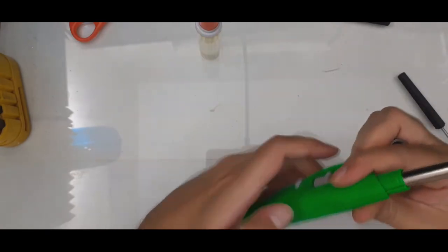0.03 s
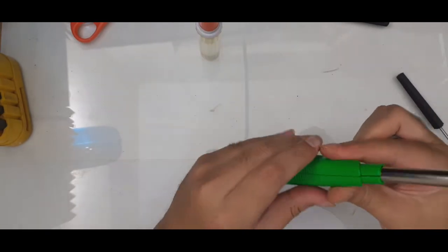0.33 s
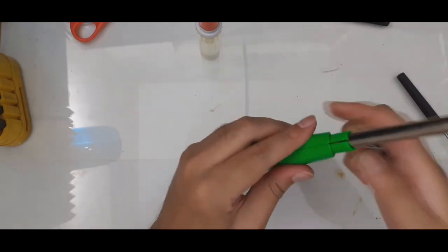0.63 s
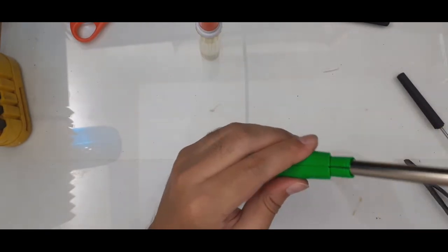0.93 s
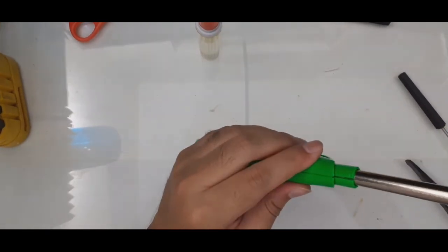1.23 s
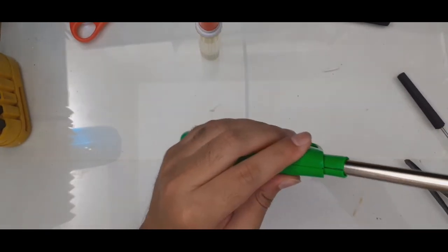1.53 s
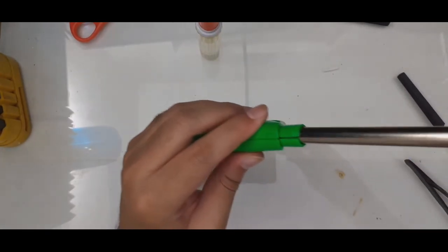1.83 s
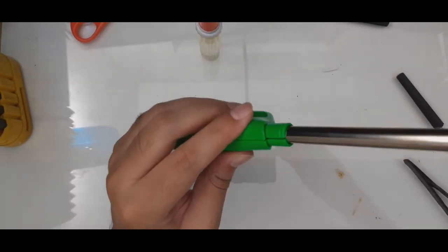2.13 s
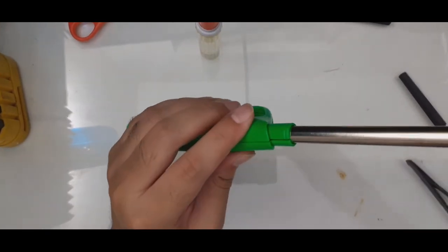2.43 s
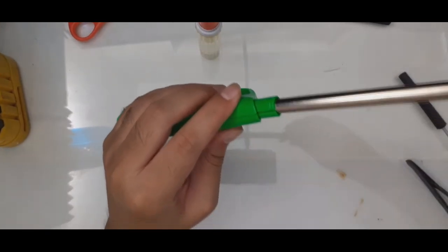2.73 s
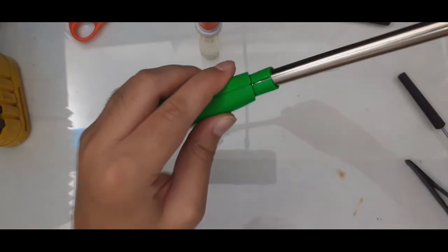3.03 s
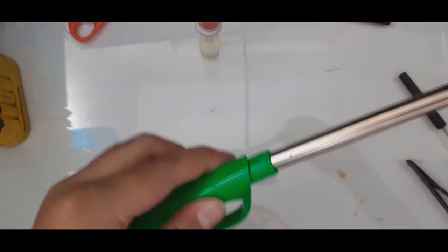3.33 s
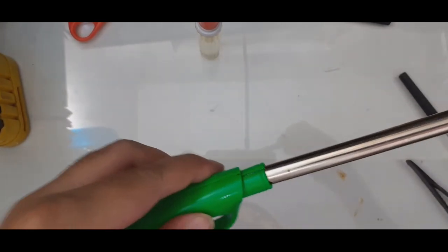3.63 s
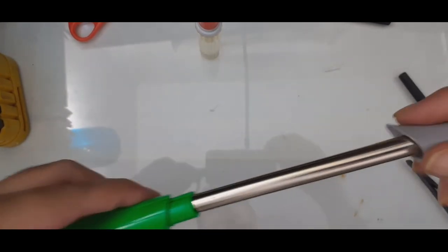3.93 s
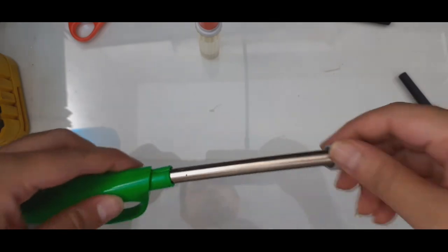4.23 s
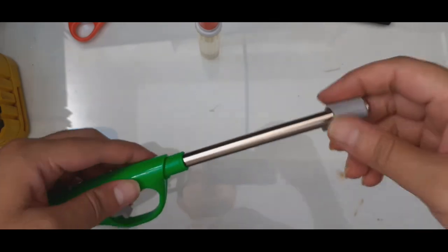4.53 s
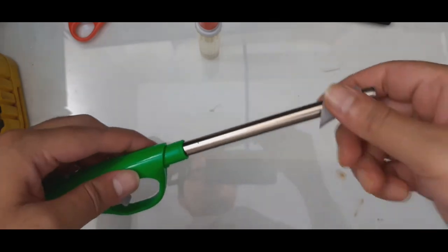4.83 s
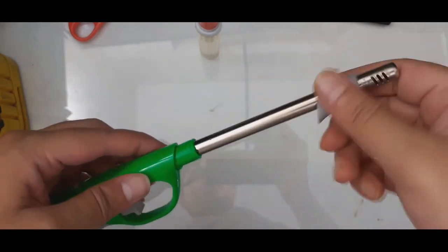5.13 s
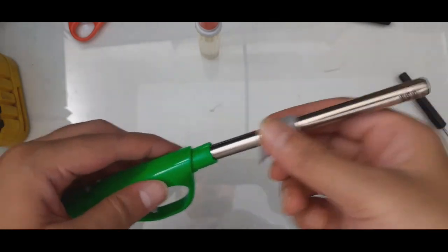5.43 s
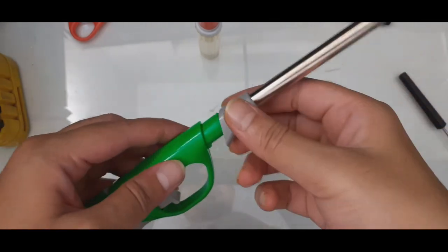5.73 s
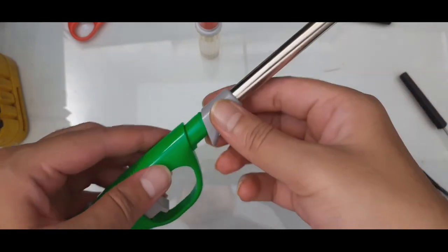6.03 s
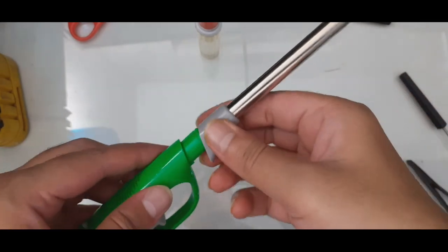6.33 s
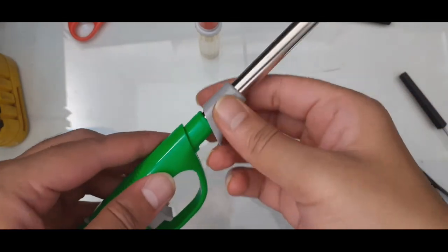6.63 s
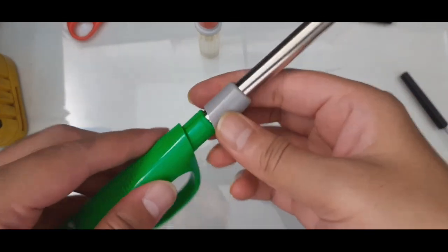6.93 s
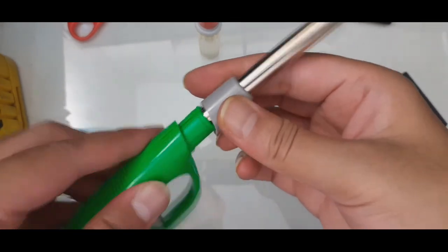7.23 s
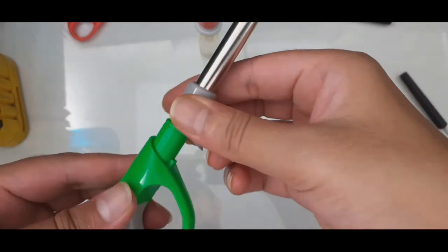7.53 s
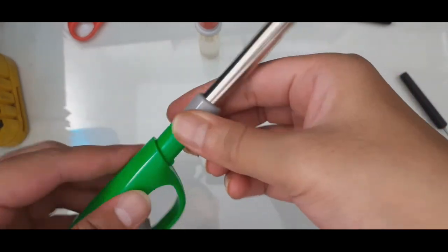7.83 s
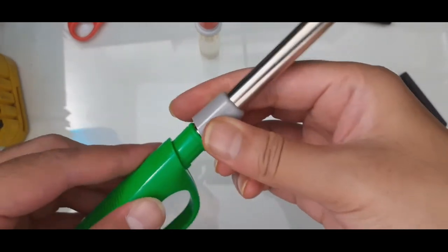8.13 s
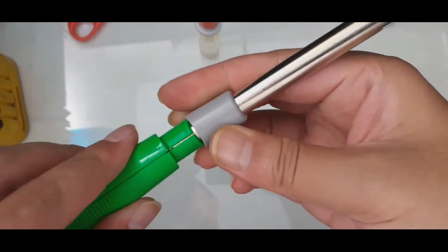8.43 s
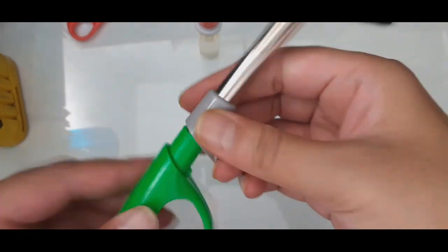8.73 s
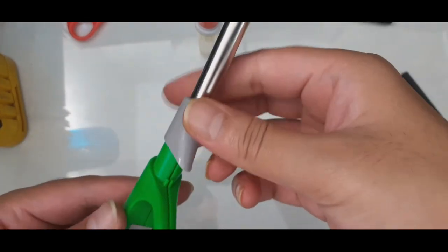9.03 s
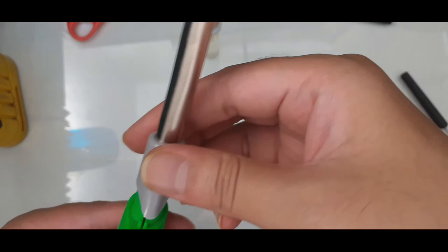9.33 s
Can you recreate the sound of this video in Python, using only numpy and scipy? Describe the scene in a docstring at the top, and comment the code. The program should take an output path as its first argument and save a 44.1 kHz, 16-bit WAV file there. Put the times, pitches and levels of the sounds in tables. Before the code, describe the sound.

Hands turn a long-necked plastic lighter close to the microphone, making light clicks and skin rustle. A dragging finger squeaks on the shell, followed by rubbing, dull bumps and louder clicks. A collar is fitted over the metal barrel, slides down with a short ringing scrape and snaps sharply against the handle. A few soft clicks close, over the low rumble of a small room.

```python
"""Light plastic clicks and skin rustle, close by: two hands turn a long-necked lighter over a table.
A dragging finger squeals on the shell by stick-slip; rubbing, dull bumps and louder clicks follow.
A collar is fitted over the metal barrel, scrapes down it, setting it ringing, and snaps against
the handle. A few soft clicks close. The small room rumbles throughout, with a faint far chirp."""
import sys
import numpy as np
from scipy import signal
from scipy.fft import rfft, irfft, next_fast_len
from scipy.io import wavfile
from scipy.ndimage import map_coordinates

SR = 44100
rng = np.random.default_rng(int(sys.argv[2]) if len(sys.argv) > 2 else 0)


def to_wav(s):
    """Save 16-bit WAV."""
    ch = np.atleast_2d(s).T  # columns
    pcm = np.round(np.clip(ch, -1, 1) * 32767)  # PCM
    wavfile.write(sys.argv[1], SR, pcm.astype(np.int16))


N = 414099
TIME = np.arange(N) / SR

# shell resonances: pitch_hz, width_hz, level_db
SHELL_MODES = [(1016, 150, -3.5), (1310, 340, -2.5), (1640, 370, 4), (2146, 800, 0), (2345, 93, 6.5),
               (2760, 200, -4.5)]
# spectrum of a contact's crack: freq_hz, level_db
CRACK_SPECTRUM = [(3000, 3), (4200, 4.5), (5200, 0.5), (7400, 3), (9500, -5), (12000, -8), (15500, -11)]
# contacts of shell, collar and barrel: start_s, body_db, pitch_hz, crack_db, crack_top_hz, pan_db
CLICKS = [(0.169, -42.5, 3520, -46, 9000, -1), (0.193, -41, 3700, -43, 7500, 1),
          (0.3578, -53, 3750, -53, 15000, 0), (0.562, -31, 1620, -43, 15000, -1),
          (0.584, -38, 1690, -49.5, 12000, -6), (1.466, -28.5, 1360, -51.5, 13900, -7),
          (1.853, -27, 1370, -43.5, 15000, -5), (2.8022, -40, 1040, -54, 12100, 0),
          (2.9194, -35, 1580, -45, 5000, 5), (3.1924, -38.5, 2060, -46.5, 15400, -4),
          (3.893, -47, 1540, -51, 9000, 8), (3.921, -25.5, 2360, -43, 11730, 2),
          (3.9742, -19, 1572, -45, 12000, 4), (3.987, -23, 2430, -38.5, 14000, -3),
          (4.0248, -32, 1620, -53, 9000, 3), (4.2061, -29.5, 1810, -44, 14500, -1),
          (4.2174, -30, 1890, -41.5, 12000, 5), (4.2522, -37, 1960, -46, 9000, 2),
          (4.7334, -28.5, 2230, -46, 12000, 4), (4.768, -29.5, 1680, -40.5, 11000, 4),
          (4.7758, -31, 1720, -51, 9000, 3), (4.8064, -34, 1620, -47, 11000, 5),
          (5.0046, -32, 1770, -59, 8000, 4), (5.1549, -28, 2310, -38.5, 14000, 1),
          (5.179, -13, 1876, -27, 15000, 0.5), (5.223, -31, 1820, -50, 12000, -1),
          (5.293, -27, 2200, -47, 11000, 3), (5.719, -33, 2050, -56, 8000, -1),
          (6.401, -43.5, 1820, -65, 7000, 6), (7.019, -47, 1850, -60.5, 6000, 4),
          (7.0778, -47, 2435, -57.5, 8160, 2), (7.7899, -44.5, 1715, -56.5, 7500, 4.5),
          (7.9744, -39.5, 1746, -58, 9000, 4), (8.6371, -49, 2550, -62, 8000, 3),
          (8.7283, -41.5, 2210, -48, 4770, 5), (8.8076, -45.5, 1720, -60, 9000, 12),
          (8.9985, -60, 2390, -58, 10000, 4)]


def clicks(rebound_s=0.0026, rebound_db=-8, ring_s=0.0071, small_part_hz=2500, small_db_per_octave=18):
    """Each contact cracks, rebounds once and rings both the shell and the struck spot."""
    crunch, t = contact_noise(), TIME[:2048]
    rings, body, crack = np.zeros((3, 2, N))

    def blow(decay_s):
        """Force of the first touch and its rebound."""
        rebound = (t > rebound_s) * np.exp(-abs(t - rebound_s) / decay_s)
        return np.exp(-t / decay_s) + from_db(rebound_db) * rebound

    for start_s, body_db, pitch_hz, crack_db, crack_top_hz, pan_db in CLICKS:
        start = round(start_s * SR)
        span = slice(start, start + len(t))
        sides = pan(pan_db)
        # small, high parts ring more by themselves and less through the shell
        loose_db = small_db_per_octave * max(0, np.log2(pitch_hz / small_part_hz))
        ring = np.exp(-t / ring_s) * np.sin(2 * np.pi * pitch_hz * t)
        rings[:, span] += sides * from_db(body_db + loose_db / 2) * ring
        body[:, span] += sides * from_db(body_db - loose_db) * blow(decay_s=0.0017) * crunch[:, span]
        lowpass = signal.butter(3, crack_top_hz, fs=SR, output="sos")
        snap = signal.sosfilt(lowpass, blow(decay_s=0.0021) * crunch[:, span])
        crack[:, span] += sides * from_db(crack_db) * snap
    shell = from_db(-6) * resonate(body, SHELL_MODES)
    return shell + from_db(-11) * rings + from_db(6) * coloured(crack, CRACK_SPECTRUM)


# collar-on-barrel resonances: pitch_hz, width_hz, level_db
COLLAR_MODES = [(1100, 280, 1.5), (1540, 190, 2), (2080, 240, -4), (2520, 220, -7.5), (2900, 180, -7)]
# narrow resonances of the metal barrel: pitch_hz, width_hz, level_db
BARREL_MODES = [(1741, 45, -2.5), (2070, 16, -17.5), (2770, 58, -16.5), (5760, 70, -16), (6430, 80, -13)]
# scrape spectrum: freq_hz, level_db
SLIDE_HISS = [(3000, -2.5), (3350, -8), (3700, -4.5), (4050, -9), (4530, -2), (5200, -2), (6500, -3.5),
              (7400, -8.5), (9500, -13), (11000, -8.5), (13000, -17), (15300, -27)]
# barrel rings that come and go as the collar passes: peak_s, pitch_hz, level_db
PASSING_RINGS = [(5.34, 4680, -47), (5.36, 2880, -47.5), (5.44, 3660, -36), (5.45, 2480, -39),
                 (5.51, 4550, -35.5), (5.51, 2960, -40)]


def collar_slide(start_s=5.298, end_s=5.574, start_speed=0.15):
    """The collar speeds up evenly down the barrel, chattering on it and setting it ringing."""
    travel_s = [start_s, end_s]
    speed = np.interp(TIME, travel_s, [start_speed, 1])
    moving = swell(start_s, rise_s=0.003, fall_s=0.0047, hold_s=end_s - start_s)
    rasp = from_db(-1.5 * drift(120))
    drag = unit_rms(rasp * friction(catches_per_s=1500, spread_db=1.5, smooth=0.7))
    hiss = from_db(-31.5) * moving * speed ** 1.48 * coloured(drag, SLIDE_HISS)
    # a near reflection shifts the colour as the hand travels
    lag_s = np.interp(TIME, travel_s, [0.000415, 0.00045])
    reflection = 0.35 * np.array([np.interp(TIME - lag_s, TIME, channel) for channel in hiss])
    chatter = from_db(-29) * moving * speed ** 1.49 * drag
    collar = from_db(-10) * resonate(chatter, COLLAR_MODES)
    barrel = from_db(-2) * resonate(chatter, BARREL_MODES)
    # the barrel's main resonance climbs as the collar nears the handle
    singing_hz = np.interp(TIME, travel_s, [1554, 1793])
    singing = from_db(3.5) * glide(chatter, singing_hz, width_hz=150)
    passing = sum(from_db(level_db) * swell(peak_s, 0.065, 0.065) * band(drag, pitch_hz, width_hz=160)
                  for peak_s, pitch_hz, level_db in PASSING_RINGS)
    return (collar + barrel + singing + hiss + reflection + moving * passing) * pan(0.5)


# collar strike and bounce: start_s, body_db, crack_db
COLLAR_HITS = [(5.5782, -15, -12.5), (5.5806, -19.5, -18)]


def collar_snap(ring_db=-27):
    """The collar hits the handle twice, ringing broadly in the shell and lingering in the barrel."""
    start_s, body_db, crack_db = np.transpose(COLLAR_HITS)
    crunch = contact_noise()
    blow = crunch * bursts(start_s, from_db(body_db), decay_s=0.0019)
    crack = crunch * bursts(start_s, from_db(crack_db), decay_s=0.0014)
    tail = crunch * bursts(start_s, from_db(body_db + ring_db), decay_s=0.038)
    shell = resonate(blow, [(1060, 900, -7), (1800, 630, 1.5), (2790, 930, -1), (3250, 630, -11)])
    barrel = resonate(tail, [(2420, 120, 0), (2830, 102, -1)])
    return coloured(crack, CRACK_SPECTRUM) + barrel + from_db(4.5) * shell


# squeal pitch, stepping up as the grip changes: time_s, pitch_hz
SQUEAL_PITCH = [(1.66, 1359), (1.72, 1386)]


def squeal(press_s=1.563, throb_hz=16.24, throb_crest_s=1.44, throb_end_s=1.73, flutter_db=3.5):
    """A finger's stick-slip sings a wavering note, throbbing at first, with an octave that fades."""
    pressure = from_db(-43.5) * swell(press_s, rise_s=0.29, fall_s=0.6, hold_s=0.46)
    pitch_hz = np.interp(TIME, *np.transpose(SQUEAL_PITCH)) + 12 * drift(60)
    phase = phase_of(pitch_hz) + np.array([[0], [0.6]])
    depth = 0.85 * np.clip((throb_end_s - TIME) * 10, 0, 1)
    throb = 1 + depth * np.cos(2 * np.pi * throb_hz * (TIME - throb_crest_s))
    fundamental = throb * from_db(flutter_db * drift(35)) * np.sin(phase)
    octave_db = -6 - 19 * np.maximum(TIME - press_s, 0)
    octave = from_db(octave_db + flutter_db * drift(35)) * np.sin(2 * phase)
    side_tone = band(stereo_noise(NEAR_CORRELATION), pitch_hz=1884, width_hz=25)
    onset = from_db(-64) * swell(1.32, rise_s=0.088, fall_s=0.1)
    return pressure * (fundamental + octave) + onset * side_tone


# single slips: start_s, level_db
SLIPS = [(1.465, -34), (1.51, -41), (1.553, -44), (1.665, -29.5), (1.706, -33), (1.790, -24.5),
         (1.8091, -24.5), (1.8542, -19), (1.9347, -26), (1.966, -32), (2.007, -24.5), (2.039, -35),
         (2.09, -35)]
# spells of grating: start_s, hold_s, level_db
GRATES = [(1.479, 0.11, -49), (1.657, 0.097, -48), (1.971, .13, -47.5)]
# resonances the slips excite: pitch_hz, width_hz, level_db
SLIP_MODES = [(1000, 170, -1.5), (1385, 194, 9.5), (1700, 320, 4), (2340, 340, -0.5), (2736, 116, 13.5)]


def finger_slips():
    """The squealing finger breaks into single slips and grating, which ring the shell."""
    slip_s, slip_db = np.transpose(SLIPS)
    slips = from_db(8.5) * bursts(slip_s, from_db(slip_db), decay_s=0.00002)
    spells = sum(from_db(level_db) * swell(start_s, rise_s=0.015, fall_s=0.062, hold_s=hold_s)
                 for start_s, hold_s, level_db in GRATES)
    grating = spells * friction(catches_per_s=160, spread_db=2, smooth=0.35)
    return resonate(slips + grating, SLIP_MODES)


# padded knocks: start_s, level_db, pitch_hz, rise_s
BUMPS = [(2.324, -35, 290.5, 0.017), (2.803, -17, 227, 0.0058), (2.822, -23, 257, 0.006),
         (2.844, -29, 208, 0.0076), (2.901, -21.5, 250, 0.0056), (2.918, -20, 158, 0.004)]


def bumps():
    """Padded knocks swell and die within a few cycles; damped flesh and plastic blur the pitch."""
    out, t = np.zeros(N), TIME[:SR // 4]
    wobble = 0.5 * drift(130)
    for start_s, level_db, pitch_hz, rise_s in BUMPS:
        start = round(start_s * SR)
        span = slice(start, start + len(t))
        push = (t / rise_s * np.exp(1 - t / rise_s)) ** 2
        out[span] += from_db(level_db) * push * np.sin(2 * np.pi * pitch_hz * t + wobble[span])
    return out


# finger and collar strokes: peak_s, rise_s, fall_s, body_db, hiss_db, ring_hz, ring_db
STROKES = [(2.35, 0.074, 0.23, -48, -48, 1480, -67), (2.815, 0.047, 0.12, -57, -58, 1720, -55.5),
           (2.935, 0.034, 0.11, -51, -55.5, 1590, -52), (3.203, 0.019, 0.089, -54.5, -54, 1700, -73),
           (3.75, 0.25, 0.26, -57.5, -55.5, 1487, -56), (3.945, 0.06, 0.04, -47, -51.5, 2420, -43),
           (4.002, 0.035, 0.15, -40, -45, 2500, -55), (4.225, 0.04, 0.078, -44.5, -54, 1830, -45),
           (4.295, 0.04, .11, -52.5, -51.5, 1520, -60), (4.73, 0.042, 0.015, -56, -51, 2100, -47),
           (4.785, 0.021, 0.061, -48, -50, 5000, -51.5), (5.172, 0.022, 0.027, -52, -47.5, 2250, -40),
           (7.31, 0.11, 0.11, -65.5, -62.5, 1550, -69), (8.8, 0.08, 0.065, -63, -64.5, 1710, -60.5)]
# bright tick of one early plastic click, then light brushes of skin: peak_s, rise_s, fall_s, level_db
TICK_AND_BRUSHES = [(0.359, .002, .01, -42), (0.925, 0.023, 0.026, -57), (1.155, 0.0093, 0.0097, -46.5),
                    (1.528, 0.053, 0.048, -51), (1.694, 0.037, 0.034, -51.5), (1.948, 0.68, 0.36, -66),
                    (2.45, 0.05, 0.12, -64), (2.79, 0.21, 0.079, -54.5), (7.794, 0.03, 0.03, -59.5)]
# spectra of stroke hiss, tick and brush hiss, and the shell's hollow undertone: freq_hz, level_db
RUB_HISS = [(1650, -56), (2800, -2.5), (3700, -5), (4400, -4.5), (5850, -5), (7400, -3), (8140, -6),
            (12200, -12.5), (13600, -19), (15500, -21)]
BRIGHT_HISS = [(4000, -8), (6500, 4.5), (8300, 3), (12000, -4.5), (15500, -9)]
UNDERTONE = [(330, -4), (440, 0), (620, -7)]


def rubs():
    """Skin and plastic drag, ringing the shell and hissing; a tick of hiss brightens one early click."""
    unevenness = from_db(1.8 * np.clip(drift(110), -2, 2))
    coarse = unit_rms(unevenness * friction(catches_per_s=400, spread_db=2, smooth=0.8))
    fine = friction(catches_per_s=2300, spread_db=5, smooth=1)
    body_gain, hiss_gain, rings = np.zeros(N), np.zeros(N), np.zeros((2, N))
    for peak_s, rise_s, fall_s, body_db, hiss_db, ring_hz, ring_db in STROKES:
        effort = swell(peak_s, rise_s, fall_s)
        body_gain += from_db(body_db) * effort
        hiss_gain += from_db(hiss_db) * effort
        rings += from_db(ring_db) * effort * band(coarse, ring_hz, width_hz=0.13 * ring_hz)
    bright_gain = sum(from_db(level_db) * swell(peak_s, rise_s, fall_s)
                      for peak_s, rise_s, fall_s, level_db in TICK_AND_BRUSHES)
    shell = resonate(coarse, SHELL_MODES) + from_db(-16.5) * coloured(coarse, UNDERTONE)
    hiss = from_db(2.5) * coloured(fine, RUB_HISS)
    strokes = body_gain * shell + rings + hiss_gain * hiss
    return strokes * pan(-0.2) + bright_gain * coloured(fine, BRIGHT_HISS)


# hand scuffs: peak_s, rise_s, level_db
SCUFFS = [(2.802, 0.0025, -44), (2.915, 0.05, -40), (8.45, 0.13, -59.5)]
# scuff spectrum: freq_hz, level_db
SCUFF_SPECTRUM = [(120, -1.5), (250, -2.5), (500, -6.5), (800, -8.5), (1100, -14.5), (1600, -18),
                  (2500, -25)]


def scuffs():
    """The hand drags dully along with the bumps and when it shifts its grip."""
    drag = friction(catches_per_s=980, spread_db=1.5, smooth=1)
    effort = sum(from_db(level_db) * swell(peak_s, rise_s, fall_s=0.16)
                 for peak_s, rise_s, level_db in SCUFFS)
    return effort * coloured(drag, SCUFF_SPECTRUM)


def fidget():
    """Restless fingers make faint patches of skin rustle."""
    activity = from_db(-78 + 3.5 * np.minimum(drift(6), 2))
    return activity * coloured(friction(catches_per_s=200, spread_db=3, smooth=1), RUB_HISS)


def far_chirps(period_s=0.4995, centre_hz=2420, fall_hz_per_s=380):
    """A faint, blurred squeak far away comes twice a second, each one sinking a little in pitch."""
    age_s = (TIME + period_s / 2) % period_s - period_s / 2
    pitch_hz = centre_hz - fall_hz_per_s * age_s + 22 * drift(70)
    phase = phase_of(pitch_hz) + np.array([[0], [1]])
    tone = np.sin(phase) + from_db(-10) * np.sin(2 * phase)
    pulse = np.exp(-0.5 * (age_s / 0.024) ** 2)
    tail = 0.35 * np.exp(-0.5 * ((age_s - 0.08) / 0.035) ** 2)
    return from_db(-66 + 2 * drift(30)) * (pulse + tail) * tone


# drone swells: peak_s, ramp_s, level_db
DRONE_SWELLS = [(2.2, 1, -44.5), (3.2, 0.42, -41.5), (4.1, 0.82, -46.5), (5.9, 0.61, -36),
                (7.55, 0.26, -45.5), (8.7, 0.53, -45.5)]
# spectra of room murmur and air hiss: freq_hz, level_db
MURMUR_SPECTRUM = [(36, -30.5), (62, -9), (76, -9), (99, -5), (130, -12.5), (205, -15.5), (226, -19),
                   (306, -24.5), (327, -29), (443, -31), (600, -40), (780, -40), (1320, -120)]
AIR_SPECTRUM = [(400, -8), (700, -10.5), (2000, -12), (3800, -20), (7500, -25), (10000, -29), (12500, -20),
                (15500, -23.5)]
# left-right likeness of far sound: freq_hz, correlation
FAR_CORRELATION = [(60, 1), (140, 0.91), (300, 0.68), (700, 0.15), (1500, 0.021), (12000, 0.0098)]


def room_rumble(drone_hz=51.9, drone_db=-51.5, upper_hz=92, width_hz=5):
    """A deep drone with a weaker upper tone surges; the murmur partly follows, under an even hiss."""
    def tone(pitch_hz):
        """A narrow resonance that swells and ebbs at random."""
        phase = 2 * np.pi * pitch_hz * TIME
        return unit_rms(drift(width_hz) * np.cos(phase) + drift(width_hz) * np.sin(phase))

    surge = 1 + sum(from_db(level_db - drone_db) * swell(peak_s, ramp_s, ramp_s)
                    for peak_s, ramp_s, level_db in DRONE_SWELLS)
    swelling = (surge - 1) * unit_rms(np.sin(phase_of(drone_hz + 2 * drift(5))))
    drone = from_db(drone_db) * (tone(drone_hz) + swelling + from_db(-11) * surge * tone(upper_hz))
    murmur = from_db(-50.5) * surge ** 0.28 * coloured(stereo_noise(FAR_CORRELATION), MURMUR_SPECTRUM)
    hiss = from_db(-63.5) * coloured(stereo_noise(FAR_CORRELATION), AIR_SPECTRUM)
    return drone + murmur + hiss


def room(x, wet_db, t60_s=0.21, gap_s=0.0034, cutoff_hz=16400):
    """Adds dense, slightly duller reflections from the table and near walls."""
    t = TIME[:SR // 2]
    envelope = from_db(-60 * t / t60_s) * np.clip(t / gap_s - 1, 0, 1)
    lowpass = signal.butter(1, cutoff_hz, fs=SR, output="sos")
    tail = signal.sosfilt(lowpass, envelope * rng.standard_normal((2, len(t))))
    return x + from_db(wet_db) * convolve(x, tail / np.linalg.norm(tail, axis=1, keepdims=True))


# left-right likeness of near sound: freq_hz, correlation
NEAR_CORRELATION = [(200, 0.8), (1400, .8), (2200, 0), (3500, 0.06), (12000, 0.05)]


def contact_noise():
    """Crunch of random sign and even strength, so each blow keeps its force."""
    return np.sign(stereo_noise(NEAR_CORRELATION))


def friction(catches_per_s, spread_db, smooth):
    """Tiny catches of uneven size come at random over a smooth drag."""
    caught = rng.random(N) < catches_per_s / SR
    sizes = from_db(spread_db * np.minimum(rng.exponential(1, N), 4))
    grains = unit_rms(signal.lfilter([1], [1, -np.exp(-1 / 20)], caught * sizes + 1e-18))
    return unit_rms((grains + smooth) * stereo_noise(NEAR_CORRELATION))


def stereo_noise(correlation):
    """White noise whose left-right correlation depends on frequency."""
    size = next_fast_len(N)
    mid, side = rfft(rng.standard_normal((2, size)))
    alike = np.clip(at_hz(correlation, np.arange(len(mid)) * SR / size), 0, 1)
    spectra = np.sqrt(1 + alike) * mid + np.sqrt(1 - alike) * side * [[1], [-1]]
    return unit_rms(irfft(spectra, size)[:, :N])


def drift(rate_hz):
    """Random wandering of unit RMS."""
    knots = rng.standard_normal(8192)
    return unit_rms(map_coordinates(knots, [TIME * rate_hz * 2], order=1, mode="wrap"))


def swell(peak_s, rise_s, fall_s, hold_s=0, depth_db=18, roundness=1.38):
    """Gesture gain: rises to 1, holds and falls; depth_db down one rise or fall time away."""
    away = np.maximum((peak_s - TIME) / rise_s, (TIME - peak_s - hold_s) / fall_s)
    gain, near = np.zeros(N), away < 4
    gain[near] = from_db(-depth_db * np.maximum(away[near], 0) ** roundness)
    return gain


def bursts(start_s, heights, decay_s):
    """Envelope of contacts with instant attack and exponential decay."""
    impulses = np.zeros(N)
    impulses[np.round(start_s * SR).astype(int)] = heights
    return signal.lfilter([1], [1, -np.exp(-1 / (decay_s * SR))], impulses + 1e-18)


def resonate(x, modes):
    """Parallel modes (pitch_hz, width_hz, level_db) of unit total power, dark beyond the outer ones."""
    t = TIME[:4096]
    response = np.zeros(len(t))
    for k, (pitch_hz, width_hz, level_db) in enumerate(modes):
        envelope = from_db(level_db) * width_hz * np.exp(-np.pi * width_hz * t)
        response += (-1) ** k * envelope * np.cos(2 * np.pi * pitch_hz * t)
    response = bandpass(response, 0.97 * modes[0][0], modes[-1][0], order=4)
    return convolve(x, response / np.linalg.norm(response))


def glide(x, pitch_hz, width_hz):
    """One resonance with a moving centre."""
    carrier = np.exp(1j * phase_of(pitch_hz))
    pole = np.exp(-np.pi * width_hz / SR)
    baseband = signal.lfilter([np.sqrt(2 * (1 - pole * pole))], [1, -pole], x / carrier + 1e-18)
    return bandpass((carrier * baseband).real, 0.8 * pitch_hz.min(), 2 * pitch_hz.max())


def band(x, pitch_hz, width_hz):
    """One steady resonance, scaled to unit RMS."""
    return unit_rms(bandpass(x, pitch_hz - width_hz / 2, pitch_hz + width_hz / 2))


def bandpass(x, low_hz, high_hz, order=2):
    """Flat-topped band filter."""
    return signal.sosfilt(signal.butter(order, [low_hz, high_hz], "band", fs=SR, output="sos"), x)


def coloured(x, spectrum, size=8192):
    """Minimum-phase filter of unit power; follows a spectrum, closed at -70 dB an octave outside."""
    freq_hz = np.arange(size // 2 + 1) * SR / size
    closed = [(spectrum[0][0] / 2, -70), *spectrum, (spectrum[-1][0] * 2, -70)]
    cepstrum = irfft(np.log(from_db(at_hz(closed, freq_hz))))
    causal = 2 * cepstrum[:size // 2] * (np.arange(size // 2) > 0)
    response = irfft(np.exp(rfft(causal, size)))
    return convolve(x, response / np.linalg.norm(response))


def convolve(x, response):
    """Stereo sound through an impulse response."""
    return signal.oaconvolve(x, np.atleast_2d(response), axes=-1)[:, :N]


def at_hz(points, freq_hz):
    """Interpolates on a log-frequency axis."""
    known_hz, values = np.transpose(points)
    return np.interp(np.log(freq_hz + 1), np.log(known_hz), values)


def phase_of(pitch_hz):
    """Running phase in radians."""
    return 2 * np.pi * np.cumsum(pitch_hz) / SR


def pan(pan_db):
    """Channel gains; positive is left."""
    return from_db([[pan_db / 2], [-pan_db / 2]])


def from_db(db):
    """Decibels to gain."""
    return 10 ** (np.asarray(db) / 20)


def unit_rms(x):
    """Scales to unit power."""
    return x / np.sqrt(np.mean(x ** 2) + 1e-20)


def scene():
    """The lighter close by, in its room."""
    handling = room(clicks() + rubs() + fidget() + collar_slide(), wet_db=-8.5)
    snap = room(collar_snap(), wet_db=-15)
    finger = room(squeal() + finger_slips(), wet_db=-4)
    knocks = room(bumps() + scuffs(), wet_db=-7.5)
    return handling + snap + finger + knocks + far_chirps() + room_rumble()


def record(dry):
    """Steep low-pass at 15.8 kHz."""
    return signal.sosfilt(signal.ellip(10, 0.1, 80, 15800, fs=SR, output="sos"), dry)


dry = scene()
out = record(dry)
to_wav(out)
```